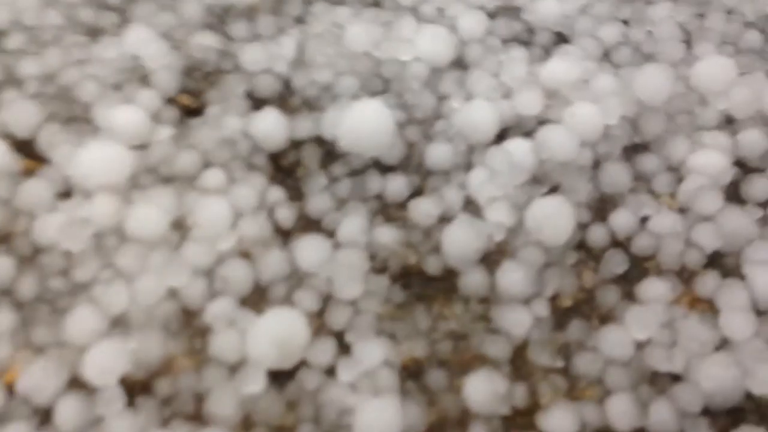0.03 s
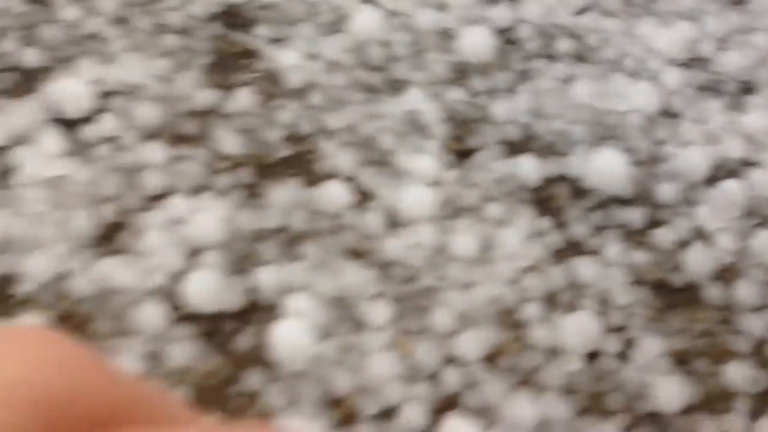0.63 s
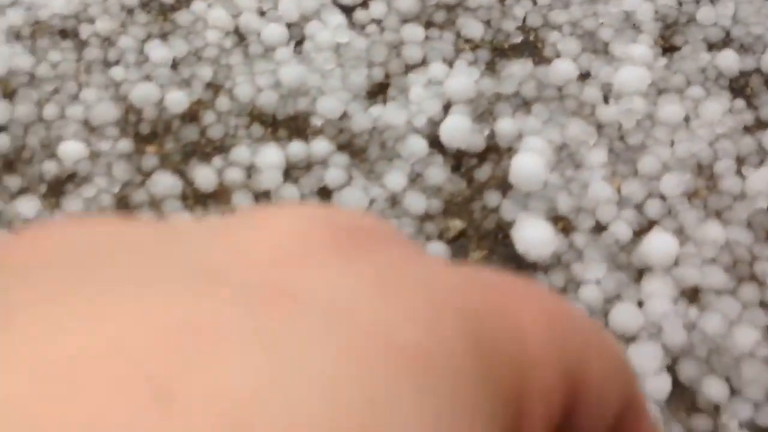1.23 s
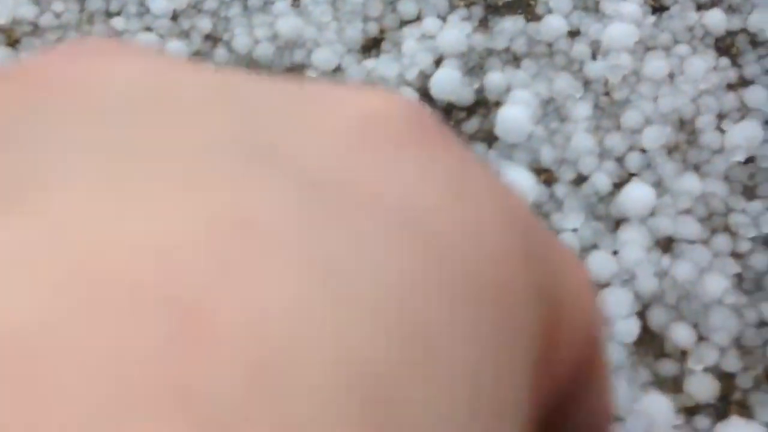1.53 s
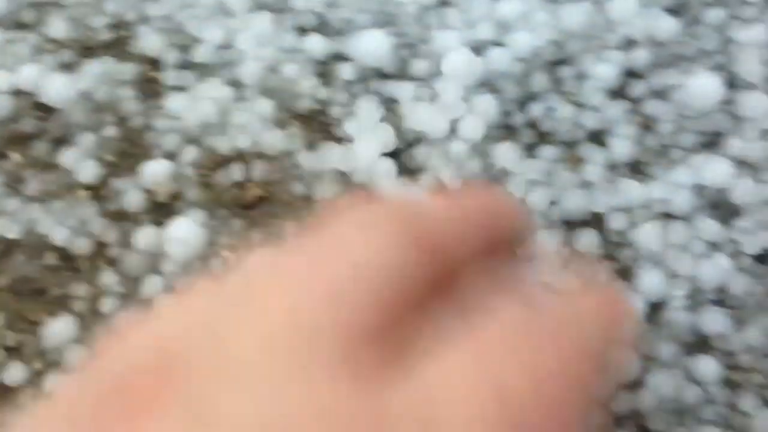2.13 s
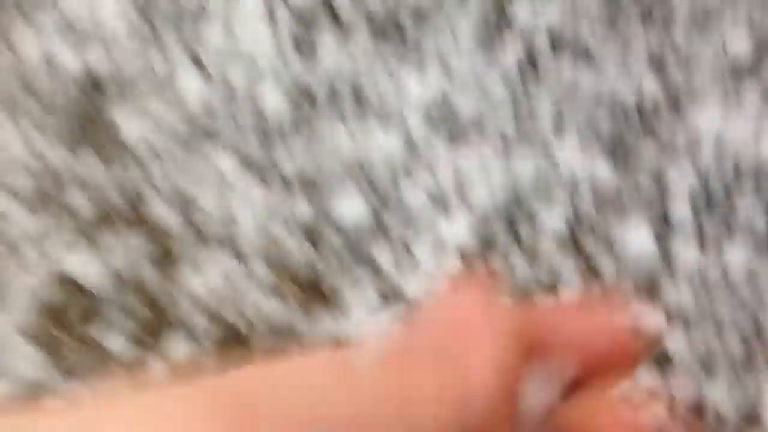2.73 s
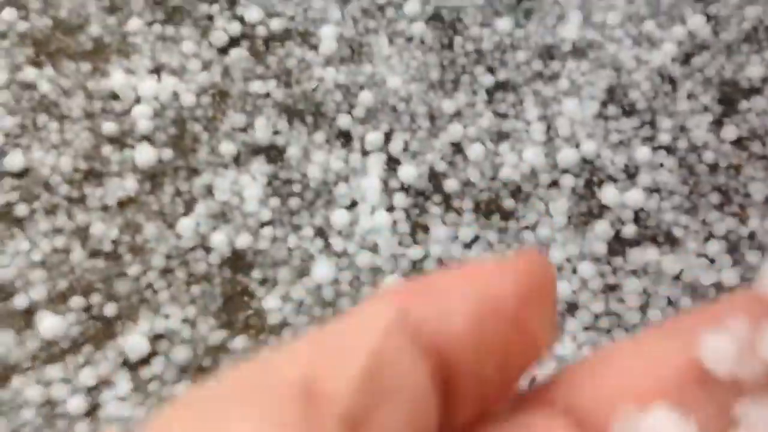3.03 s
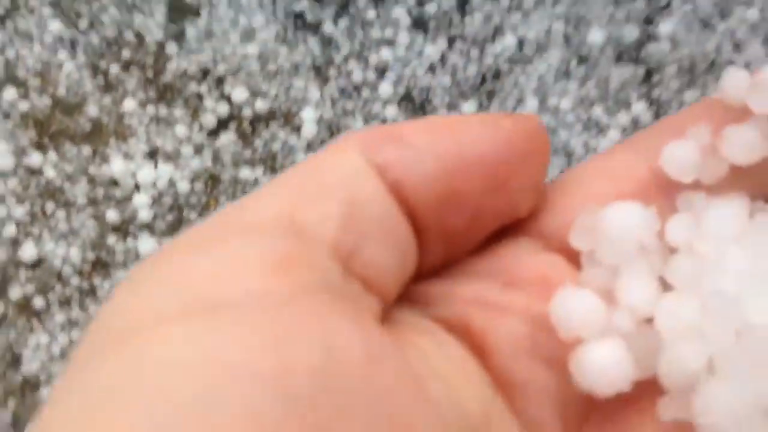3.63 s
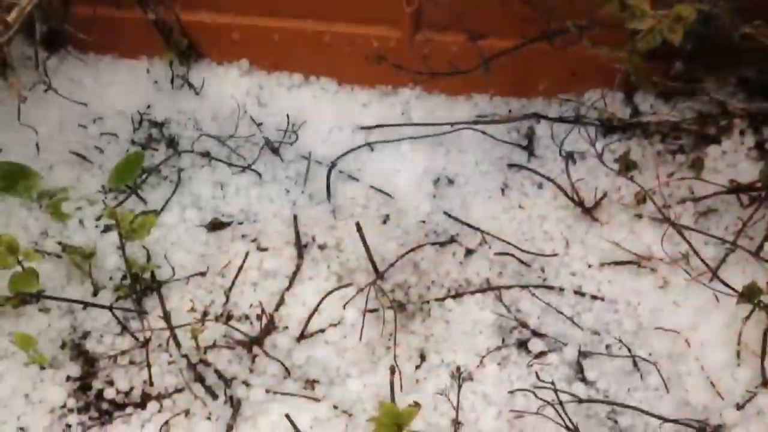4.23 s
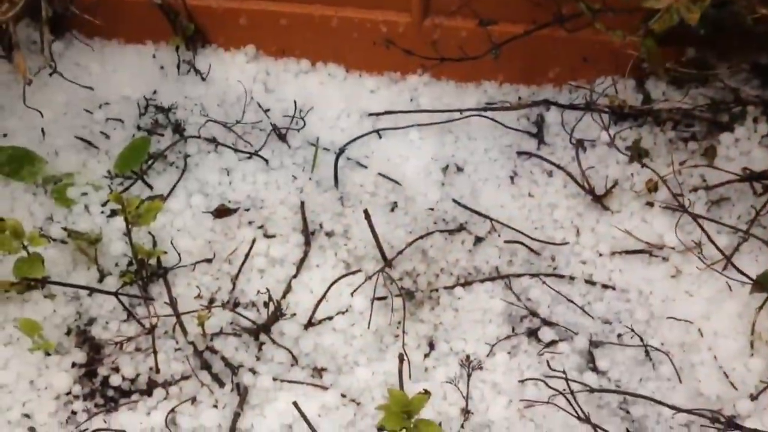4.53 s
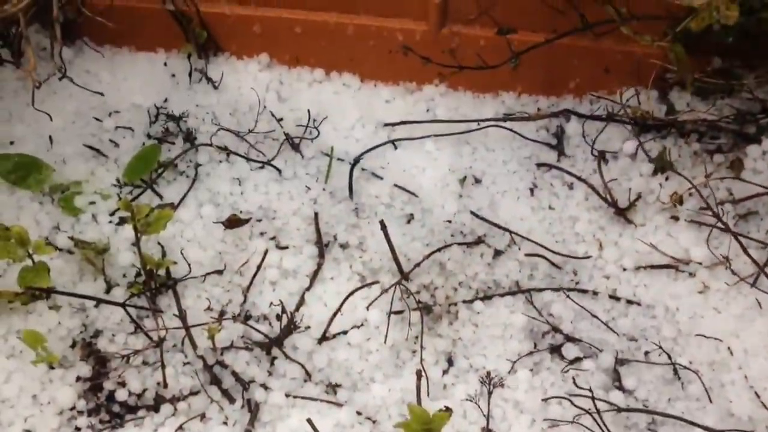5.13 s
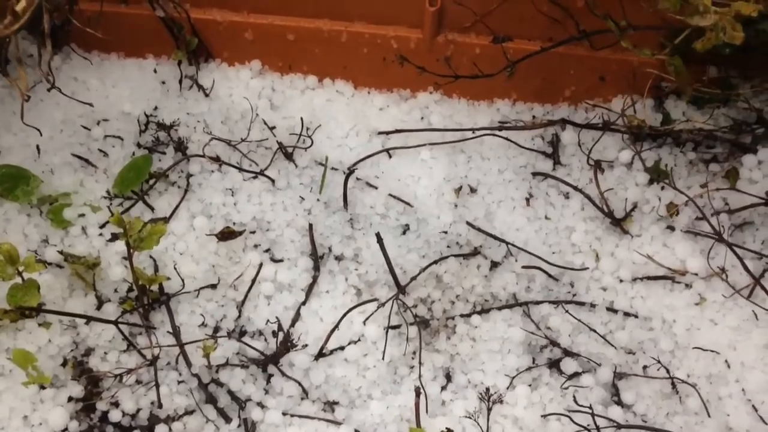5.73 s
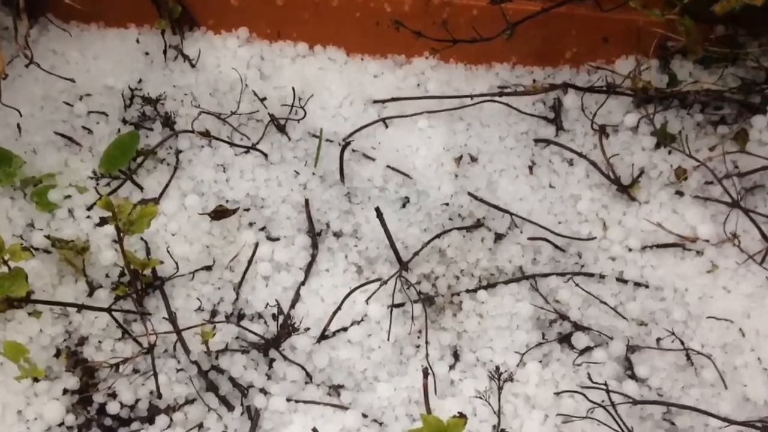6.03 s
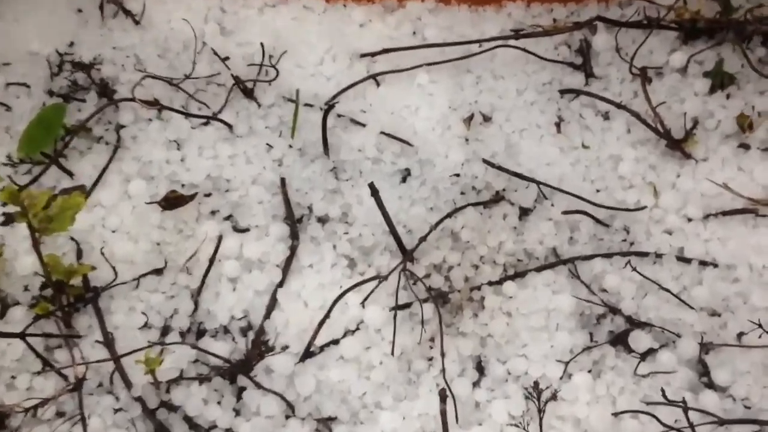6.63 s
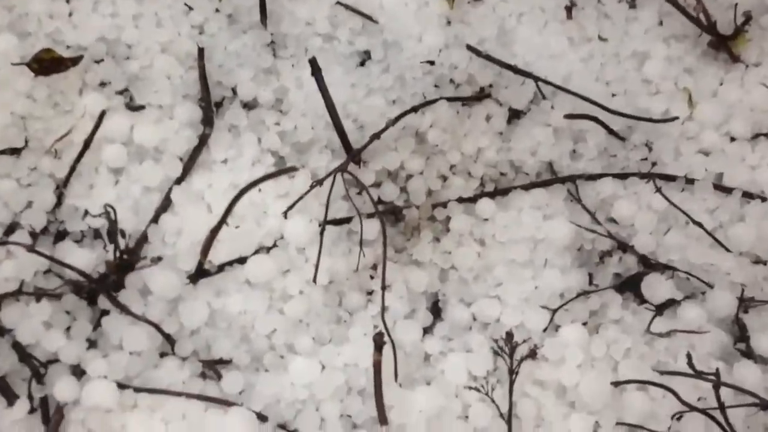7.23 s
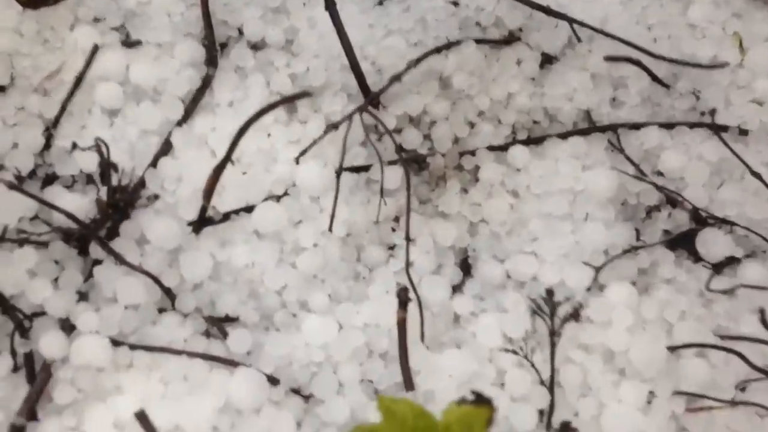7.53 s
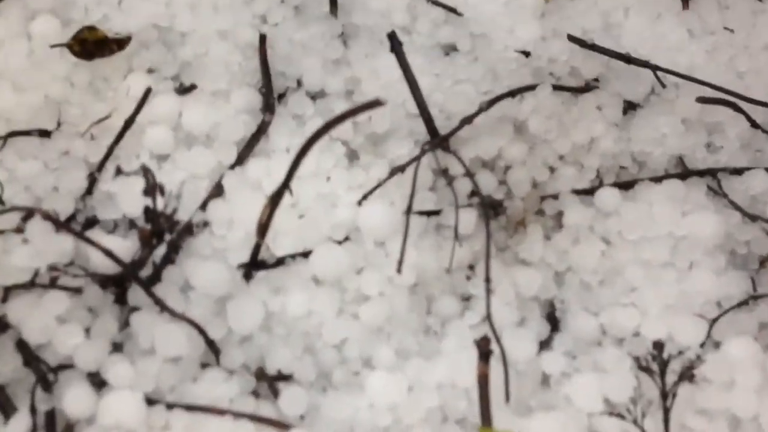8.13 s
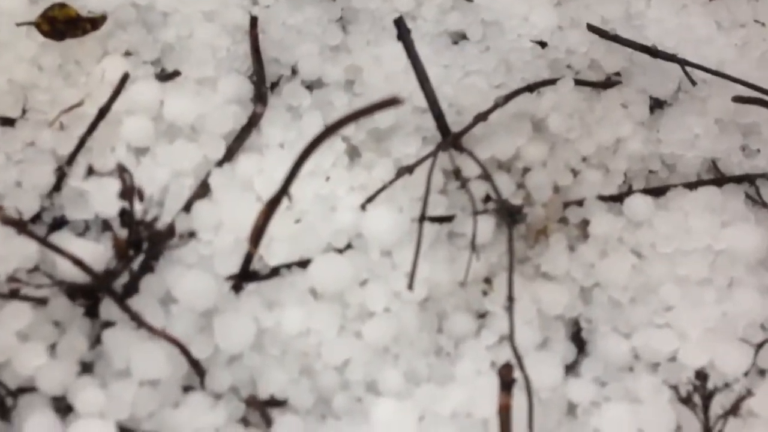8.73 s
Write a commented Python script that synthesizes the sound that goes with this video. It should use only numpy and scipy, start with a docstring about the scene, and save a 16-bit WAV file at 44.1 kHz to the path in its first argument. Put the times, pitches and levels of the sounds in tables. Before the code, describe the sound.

Hailstones crackle and click on wet ground as a hand brushes through them right by the microphone, building to one crunchy handful. Steady rain and a deep outdoor rumble lie underneath, with a faint airy whistle passing after the scoop. The background then turns softer and duller in a flower bed, where melt water drips, ice grains tick lightly and something wet slides for a moment.

```python
"""A hand rakes through hailstones on wet ground, then closes on a fistful, very near. Each slip is
an avalanche of tiny cracks ringing the stones and the cupped hand. Rain hisses over a low outdoor
rumble, grains of ice tick, drops plip onto the ice and a faint whistle passes near 4 s.
From 4.3 s on the place is a quieter flower bed, where melt water drips, the grains go on
ticking and something wet slithers briefly."""
import sys
import numpy as np
from scipy import signal
from scipy.fft import rfft, irfft, next_fast_len
from scipy.io import wavfile
from scipy.ndimage import uniform_filter1d

SR = 44100
rng = np.random.default_rng(int(sys.argv[2]) if len(sys.argv) > 2 else 0)


def unload_wav(signal):
    """Save mono or channel-first audio to the path in sys.argv[1] as 16-bit WAV at rate SR, clipped to [-1, 1]."""
    wavfile.write(
        sys.argv[1],
        SR,
        np.round(np.clip(np.atleast_2d(signal).T, -1, 1) * 32767).astype(np.int16),
    )


N = 395577
MOVE_S, MOVE_FADE_S = 4.275, 0.02  # crossfade from open ground to flower bed


def amp(db):
    """Decibels to gain."""
    return 10 ** (np.asarray(db) / 20)


def unit_rms(x):
    """Scales to rms 1."""
    return x / np.sqrt(np.mean(x ** 2) + 1e-20)


def eq_gain(points, hz):
    """Gain of an EQ curve drawn through (freq_hz, gain_db) points on a log-frequency axis."""
    f, db = np.transpose(points)
    return amp(np.interp(np.log(hz + 1), np.log(f + 1), db))


def add(mix, start_s, sound):
    """Mixes a sound in at start_s."""
    part = mix[max(round(start_s * SR), 0):][:len(sound)]
    part += sound[:len(part)]


def ring(x, gain_at, size=2048):
    """Rings x through a minimum-phase body of unit energy, shaped by gain_at(hz)."""
    gain = unit_rms(gain_at(abs(np.fft.fftfreq(size, 1 / SR)) + 1))
    log_gain = np.log(np.maximum(gain, 1e-5))
    response = np.fft.ifft(np.exp(np.conj(signal.hilbert(log_gain)))).real
    return signal.fftconvolve(x, response[:size // 2])


def resonance(f, hz, width_hz):
    """Gain of one broad resonance, 1 at its centre."""
    return 1 / np.hypot(1, (f * f - hz * hz) / (f * width_hz))


def cracks(samples, per_s, spread_db):
    """Random clicks of either sign: many small, a few large."""
    chance, size, sign = rng.random((3, samples))
    size_db = spread_db * np.minimum(-np.log(1 - size), 3.5)
    return (chance < per_s / SR) * amp(size_db) * np.sign(sign - .5)


def wander(shape, blur):
    """Smooth random modulation of rms 1; blur is the smoothing width along each axis."""
    field = rng.standard_normal(shape)
    for axis, width in enumerate(blur):
        field = uniform_filter1d(uniform_filter1d(field, width, axis), width, axis)
    return unit_rms(field)


def scatter(from_s, to_s, level_db, spread_db, centre_hz, count):
    """One random hit per equal time slot, across an octave: start_s, level_db, pitch_hz."""
    when, size, pitch = rng.random((count, 3)).T
    start_s = from_s + (to_s - from_s) * (np.arange(count) + when) / count
    return zip(start_s, level_db + spread_db * (2 * size - 1), centre_hz * 2 ** (pitch - .5))


def ambience(rumble_levels, hiss_levels, eq, rain_top_hz, rumble_trim_db, rain_trim_db, spread_db,
             fizz_trim_db=-1.5, rumble_top_hz=380):
    """Three bands of outdoor air: smooth rumble, a wash of far rain, a fizz of fine drops on ice."""
    t = np.arange(N) / SR
    time_s, *hiss_db = np.transpose(hiss_levels)
    rain, fizz = (amp(np.interp(t, time_s, db)) for db in hiss_db)
    rumble = amp(np.interp(t, *np.transpose(rumble_levels)))
    size = next_fast_len(N)
    f = np.fft.rfftfreq(size, 1 / SR)
    below_rain, below_fizz = (1 / (1 + (f / hz) ** 8) for hz in (rumble_top_hz, rain_top_hz))
    colour = eq_gain(eq, f)

    def band(source, share):
        return unit_rms(irfft(rfft(source) * colour * np.sqrt(share), size)[:N])
    smooth, wash = rng.standard_normal((2, size))
    drops = unit_rms(cracks(size, per_s=7000, spread_db=spread_db)) + wash
    return (amp(rumble_trim_db) * rumble * band(smooth, below_rain)
            + amp(rain_trim_db) * rain * band(drops, (1 - below_rain) * below_fizz)
            + amp(fizz_trim_db) * fizz * band(drops, 1 - below_fizz))


# Rumble fader on open ground, before trim: time_s, level_db
GROUND_RUMBLE = [(0, -40), (.12, -38.5), (.2, -43), (.7, -45.5), (1.3, -44), (2.7, -43), (3.25, -43.5),
                 (3.6, -47.5), (4.3, -46)]
# Rain and ice-fizz faders on open ground, before trim: time_s, rain_db, fizz_db
GROUND_HISS = [(0, -59.5, -50.5), (.6, -58.5, -48.5), (1.55, -61, -46), (1.9, -60.5, -50),
               (2.7, -59.5, -45.5), (2.95, -61, -51), (3.85, -60.5, -50.5), (4.15, -57, -49.5)]
# Tone of the air on open ground: freq_hz, gain_db
GROUND_EQ = [(15, -48), (25, -18), (69, -3), (91, 0.5), (240, -10.5), (331, -21.5), (509, -27.5),
             (1240, -30.5), (1340, -30), (1800, -30), (2010, -30.5), (3530, -24.5), (6920, -23),
             (14300, -31.5), (15500, -35)]


def open_ground():
    """Rain and a bright fizz of ice over a deep outdoor rumble."""
    return ambience(GROUND_RUMBLE, GROUND_HISS, GROUND_EQ, rain_top_hz=2500,
                    rumble_trim_db=0.5, rain_trim_db=4.5, spread_db=5.0)


def patchy(x, patch_db=2.18, flicker_db=0.73, gust_db=2.5, gust_hz=200):
    """Rain lands unevenly: patches in time and pitch, a shared flicker, and a lumpy low end."""
    f, _, spectrum = signal.stft(x, SR, nperseg=512)
    patches = wander(spectrum.shape, blur=[3, 4])
    flicker = wander(spectrum.shape[1], blur=[2])
    gusts = wander(spectrum.shape[1], blur=[6])
    low = 1 / (1 + (f[:, None] / gust_hz) ** 4)
    db = patch_db * patches * (1 - low) + flicker_db * flicker + gust_db * low * gusts
    return signal.istft(spectrum * amp(db), SR, nperseg=512)[1][:N]


def snap(hz, peak_s=0.00056, width_share=0.46, low_cut_share=0.42):
    """A grain of ice snaps: a very short noise burst rings it at hz."""
    t = np.arange(600) / SR
    burst = rng.standard_normal(len(t)) * t / peak_s * np.exp(1 - t / peak_s)
    return ring(burst, lambda f: resonance(f, hz, width_share * hz)
                / np.hypot(1, (low_cut_share * hz / f) ** 3))


# The sharpest snaps of single stones, before the close-up boost: start_s, level_db, pitch_hz
TICKS = [(.268, -42, 5500), (.6125, -31, 5000), (0.642, -24.5, 3900), (0.9375, -22, 7000),
         (1.0115, -34, 6000), (1.3805, -26, 5530), (2.3825, -32, 4100), (2.4445, -15, 4430),
         (2.5362, -20, 4200), (2.6012, -32, 5500), (2.7528, -38.5, 4500), (3.7675, -37.5, 7900),
         (4.8479, -45, 7000), (4.9745, -43.5, 3700), (5.7447, -45, 6260), (6.487, -36, 2970),
         (6.5176, -46, 6670), (7.0642, -33.5, 6540), (7.3138, -46, 6000), (8.7906, -40, 6720),
         (8.849, -42.5, 8350)]


def ticks(boost_db=3.0):
    """The clear snaps, and the faint prickle of ice thawing all around."""
    out = np.zeros(N)
    for start_s, db, hz in TICKS:
        add(out, start_s, amp(db + boost_db) * snap(hz))
    ground = scatter(0, MOVE_S, level_db=-45.5, spread_db=9.5, centre_hz=8500, count=55)
    bed = scatter(MOVE_S, N / SR, level_db=-53.5, spread_db=6, centre_hz=7900, count=65)
    for start_s, db, hz in [*ground, *bed]:
        add(out, start_s, amp(db) * snap(hz))
    return out


def crunch(length_s, level_db, centre_hz, slope_db_per_octave, hollow_db,
           release_s=0.0068, settle_s=0.044, settle_db=-16, rub_db=-9, clump_db=0.97,
           stone_q=1.15, low_cut_hz=2600, top_hz=15000, clink_db=-3.0, floor_db=-21):
    """One slip: an avalanche of tiny cracks that ring the stones and the hollow of the hand."""
    clink_hz = centre_hz * 2 ** (0.26 * (2 * rng.random() - 1))  # one stone stands out

    def stones_in_hand(f):
        ratio = f / centre_hz
        ice = ratio * stone_q * resonance(f, centre_hz, centre_hz / stone_q)
        ice *= amp(slope_db_per_octave * np.log2(np.maximum(ratio, 1)))
        ice /= np.hypot(1, (low_cut_hz / f) ** 4)  # small stones radiate little bass
        ice *= 1 + amp(clink_db) * resonance(f, clink_hz, width_hz=400) ** 2
        hollow = amp(hollow_db) * resonance(f, hz=1660, width_hz=740) ** 2  # air in the cupped hand
        return np.sqrt(ice ** 2 + hollow ** 2 + amp(floor_db) ** 2) / np.hypot(1, (f / top_hz) ** 4)
    t = np.arange(SR // 4) / SR
    attack_s = 0.001 + 0.072 * length_s * amp(-25.5 - level_db)  # long, weak slips build up slowly
    after_s = np.maximum(t - length_s, 0)
    trickle = amp(settle_db) * np.exp(-after_s / settle_s)  # loosened stones go on settling
    force = (1 - np.exp(-t / attack_s)) * (np.exp(-after_s / release_s) + trickle)
    clumps = amp(clump_db * wander(len(t), blur=[90]))  # one crack sets off its neighbours
    grit = unit_rms(cracks(len(t), per_s=3500, spread_db=1.0))
    rub = amp(rub_db) * rng.standard_normal(len(t))
    sound = ring(force * clumps * (grit + rub), stones_in_hand)
    return amp(level_db) * sound * np.sqrt(length_s * SR / np.sum(sound ** 2))


# Slips of the packed stones: start_s, length_s, level_db, centre_hz, slope_db_per_octave
SLIPS = [(0.447, 0.019, -42, 4000, 0), (0.508, .014, -40, 5500, -2), (0.566, 0.0074, -35, 8500, -15),
         (0.587, 0.048, -29.5, 4800, -2.5), (0.64, 0.014, -22.5, 4450, -5),
         (0.654, 0.031, -28.5, 5940, -4.5), (0.804, 0.0095, -39.5, 5000, 1),
         (0.885, 0.019, -28.5, 5500, -0.5), (.901, 0.017, -25, 5000, -3), (.925, 0.024, -25, 6860, -12),
         (1.008, .025, -40, 5600, -3), (1.181, 0.019, -35.5, 6600, -9), (1.332, .005, -34, 5100, -10),
         (1.379, 0.014, -22.5, 4450, -3), (1.446, .006, -28.5, 7900, -7), (1.541, 0.0037, -36, 4200, -2),
         (1.555, .022, -34, 6040, -6), (1.665, 0.012, -27.5, 6200, -6), (2.076, 0.083, -35.5, 5000, 0.5),
         (2.132, 0.079, -24, 4300, -2), (2.193, 0.017, -20.5, 4330, -10), (2.211, 0.038, -22, 4000, -4.5),
         (2.251, 0.043, -24.5, 4400, -4.5), (2.307, 0.019, -26.5, 4740, -6), (2.33, 0.014, -21, 4800, -4.5),
         (2.347, .034, -27.5, 4850, -6.5), (2.396, 0.0075, -19.5, 4240, -6.5),
         (2.417, 0.035, -27, 5130, -5), (2.44, 0.0038, -13, 4440, -8.5), (2.458, 0.028, -21, 4670, -5.5),
         (2.488, .044, -27, 4400, -7), (2.533, .023, -23.5, 3600, -6.5), (2.561, 0.035, -33.5, 3700, -9),
         (2.636, 0.015, -36.5, 3900, -4.5)]
# Ring of the hand's hollow against the crackle as the fingers close: time_s, hollow_db
CUPPING = [(1.7, -16), (2.2, -8.5), (2.31, 0.5), (2.36, 1.5), (2.4, -19), (2.46, -11.5), (2.53, -5),
           (2.64, -14)]


def hand():
    """The hand rakes the hailstones and scoops a fistful, slip by slip."""
    out = np.zeros(N)
    for start_s, *slip in SLIPS:
        hollow_db = np.interp(start_s, *np.transpose(CUPPING))
        add(out, start_s, crunch(*slip, hollow_db))
    return out


def drop(hz, splash_db, plip_s=0.00191, thud_hz=300, thud_db=-15.5, spray_trim_db=-7, patter_db=-15.5):
    """A drop lands: a round plip of a few cycles, a soft thud, a bright spray and a little patter."""
    t = np.arange(2048) / SR

    def swell(peak_s):
        return t / peak_s * np.exp(1 - t / peak_s)
    plip = swell(plip_s) ** 14.8 * np.cos(2 * np.pi * hz * (t - plip_s))  # high power: a narrow pulse
    thud = amp(thud_db) * swell(peak_s=0.0026) ** 2 * np.sin(2 * np.pi * thud_hz * t)
    fine, coarse = rng.standard_normal((2, len(t)))
    spray = ring(fine * swell(peak_s=0.0019) ** 2, lambda f: resonance(f, hz=3070, width_hz=2000))
    patter = ring(coarse * swell(peak_s=0.0028), lambda f: resonance(f, hz, width_hz=0.87 * hz) ** 2)
    splash = amp(splash_db + spray_trim_db) * spray + amp(patter_db) * patter
    return plip + thud + splash[:len(t)]


# Near drops and stones landing on ice, before boost and trim: start_s, level_db, pitch_hz, splash_db
DRIPS = [(0.914, -36, 710, 7), (1.667, -39, 1040, 6.5), (2.806, -41.5, 907, -9), (3.247, -43, 1990, 3),
         (3.599, -37.5, 1680, 1.5), (3.781, -37, 1150, -5), (4.956, -34.5, 900, -16),
         (5.167, -41, 1100, -14), (5.303, -33, 1200, -14), (5.918, -40, 1700, -15), (6.289, -40, 1110, -3),
         (6.485, -29.5, 1290, -8), (6.518, -30.5, 915, -4), (6.567, -37, 1420, -20), (6.708, -42, 660, -12),
         (7.378, -42.5, 880, -18), (7.676, -44, 1160, -10), (8.105, -26, 1140, -27), (8.28, -40, 1780, -4),
         (8.621, -39.5, 756, -15), (8.79, -34.5, 1330, -0.5), (8.896, -35.5, 1440, -22),
         (8.945, -42.5, 1970, -1.5)]


def drips(boost_db=3):
    """The near drops, stray softer ones, and a blended patter further off in the flower bed."""
    out = np.zeros(N)
    for start_s, db, hz, splash_db in DRIPS:
        add(out, start_s, amp(db + boost_db) * drop(hz, splash_db))
    for start_s, db, hz in scatter(2.7, N / SR, level_db=-42.5, spread_db=3, centre_hz=1430, count=13):
        add(out, start_s, amp(db) * drop(hz, splash_db=-8))
    far = scatter(MOVE_S, N / SR, level_db=-53.5, spread_db=2, centre_hz=1710, count=420)
    for start_s, db, hz in far:
        add(out, start_s, amp(db) * drop(hz, splash_db=-8))
    return out


def whistle(start_s=3.95, length_s=0.31, level_db=-55.0, pitch_hz=3480, width_hz=450):
    """A faint, airy whistle of narrow-band noise swells and fades in the hiss."""
    t = np.arange(N) / SR
    swell = np.sin(np.pi * np.clip((t - start_s) / length_s, 0, 1))
    airy_tone = ring(rng.standard_normal(N), lambda f: resonance(f, pitch_hz, width_hz) ** 2)
    return amp(level_db) * swell * unit_rms(airy_tone[:N])


# Rumble fader in the flower bed, before trim: time_s, level_db
BED_RUMBLE = [(4.3, -60), (6.2, -57), (8.97, -54.5)]
# Rain and ice-fizz faders in the flower bed, before trim: time_s, rain_db, fizz_db
BED_HISS = [(4.3, -58.5, -56.5), (6.1, -57, -56), (6.7, -55, -57), (7.4, -58, -58.5), (8.55, -58, -58.5),
            (8.97, -57, -58.5)]
# Tone of the air in the flower bed: freq_hz, gain_db
BED_EQ = [(25, -26), (50, -7), (105, -3.5), (175, -5.5), (290, -10.5), (400, -16.5), (560, -14),
          (800, -17.5), (1130, -15.5), (1480, -14), (2350, -20), (2750, -26), (10000, -39), (15500, -45.5)]


def flower_bed():
    """Softer, darker rain with only a little rumble under it."""
    return ambience(BED_RUMBLE, BED_HISS, BED_EQ, rain_top_hz=3290,
                    rumble_trim_db=2.5, rain_trim_db=-2.0, spread_db=4.0)


# Envelope of the wet slither: time_s, level_db
SLITHER_SWELL = [(6.39, -66), (6.41, -46.5), (6.445, -46.5), (6.468, -40), (6.49, -51), (6.515, -51),
                 (6.56, -64)]
# Tone of the wet slither: freq_hz, gain_db
SLITHER_EQ = [(180, -45), (300, -17), (507, 2), (647, -6), (691, -8), (991, -0.5), (1570, -23), (1760, -2),
              (2210, -0.5), (2970, -11), (4120, -4), (15000, -24)]


def slither():
    """Something wet slides: a swell of fine grains through a few midrange resonances."""
    time_s, level_db = np.transpose(SLITHER_SWELL)
    t = np.arange(time_s[0], time_s[-1], 1 / SR)
    swell = amp(np.interp(t, time_s, level_db))
    grains = unit_rms(cracks(len(t), per_s=4000, spread_db=0.5))
    out = np.zeros(N)
    add(out, time_s[0], ring(swell * grains, lambda f: eq_gain(SLITHER_EQ, f)))
    return out


def reflections(x, wet_db=-18, decay_s=0.031, predelay_s=0.002):
    """Adds faint early scatter from the ground and nearby things."""
    t = np.arange(4096) / SR
    tail = cracks(len(t), per_s=3000, spread_db=0) * np.exp(-t / decay_s) * (t > predelay_s)
    return x + amp(wet_db) * signal.oaconvolve(x, tail / np.linalg.norm(tail))[:N]


def scene():
    """Open ground gives way to the flower bed; the near sounds lie on top, in mono."""
    crossfade = np.clip((np.arange(N) / SR - MOVE_S) / MOVE_FADE_S + .5, 0, 1)
    background = (1 - crossfade) * open_ground() + crossfade * flower_bed()
    near = reflections(hand() + drips() + ticks() + slither() + whistle())
    return (near + patchy(background))[None]


def record(dry):
    """A steep low-pass takes off the very top of the treble."""
    low_pass = signal.firwin(511, cutoff=15450, window=("kaiser", 9), fs=SR)
    return signal.oaconvolve(dry, low_pass[None], "same")


dry = scene()
out = record(dry)
unload_wav(out)
```